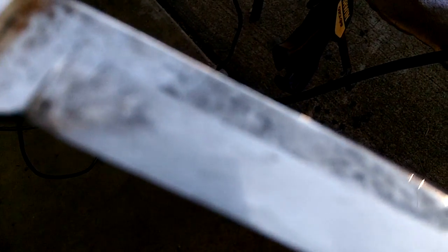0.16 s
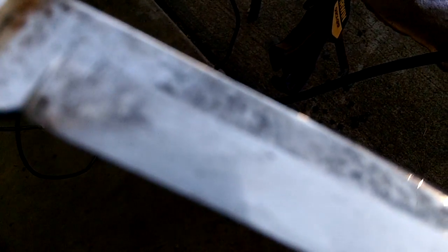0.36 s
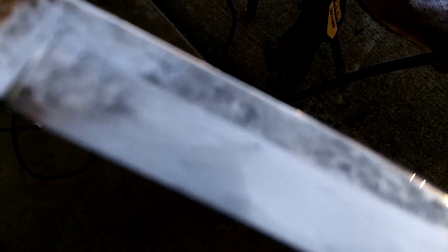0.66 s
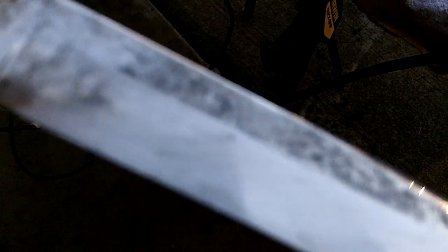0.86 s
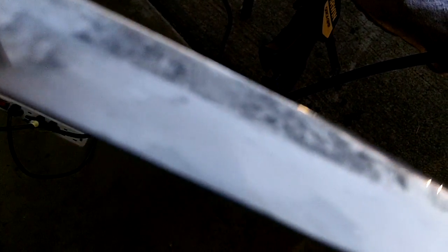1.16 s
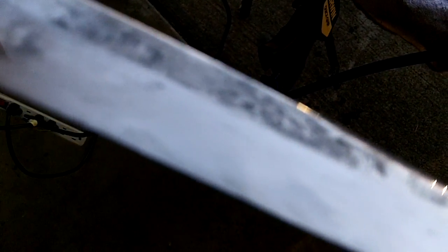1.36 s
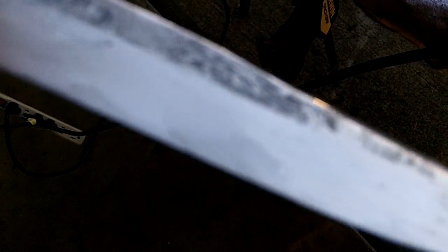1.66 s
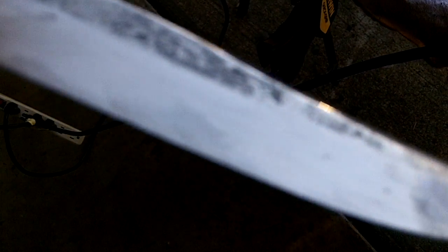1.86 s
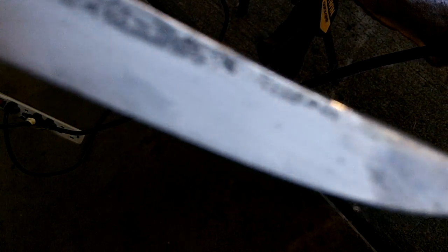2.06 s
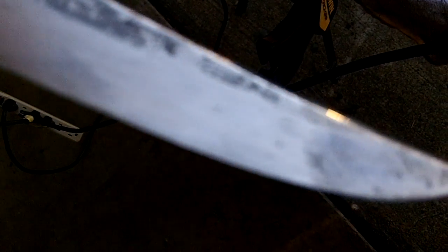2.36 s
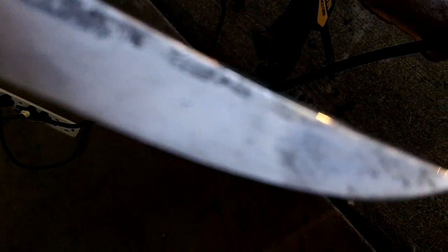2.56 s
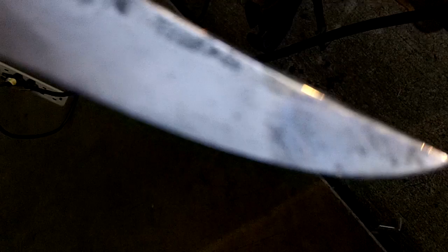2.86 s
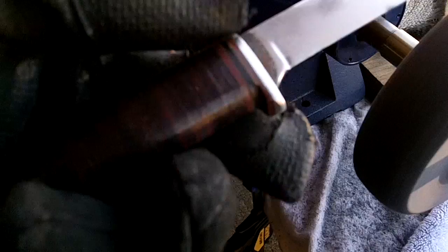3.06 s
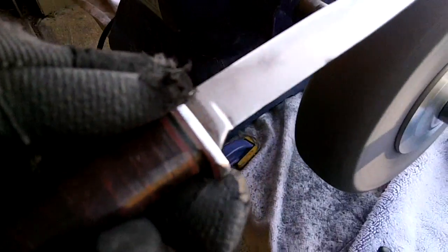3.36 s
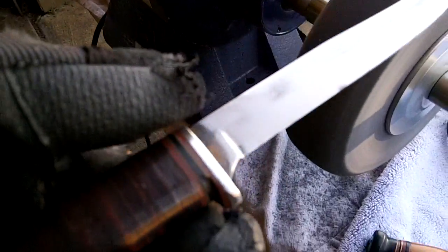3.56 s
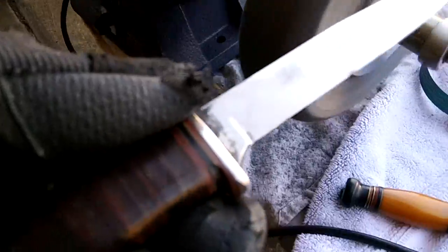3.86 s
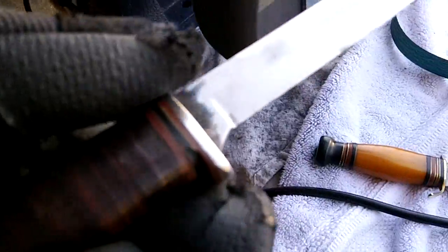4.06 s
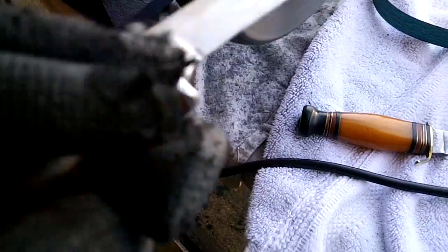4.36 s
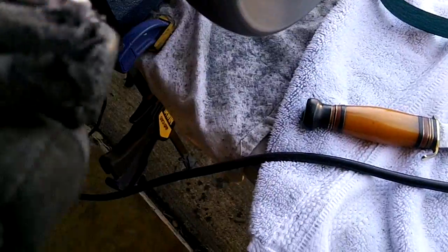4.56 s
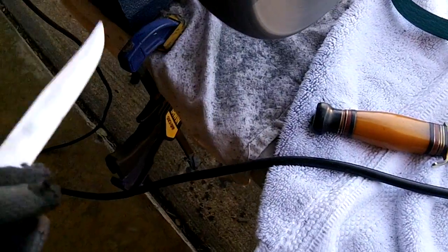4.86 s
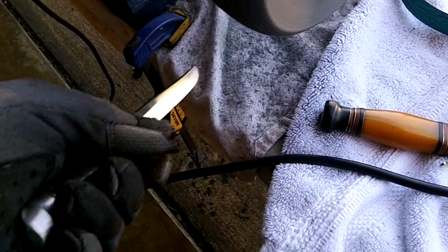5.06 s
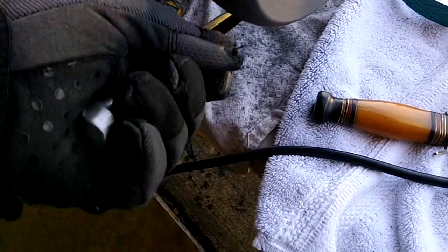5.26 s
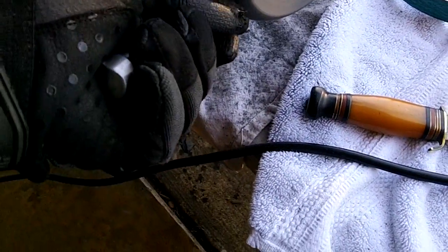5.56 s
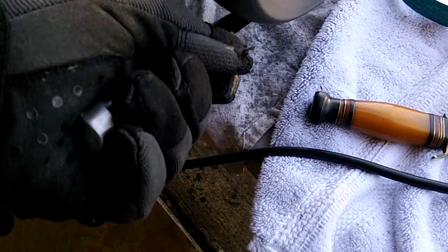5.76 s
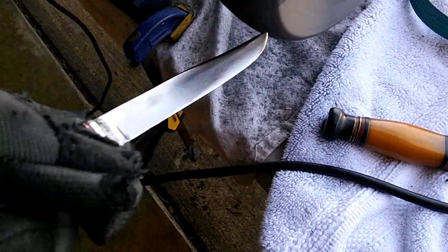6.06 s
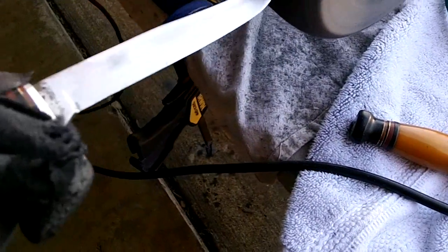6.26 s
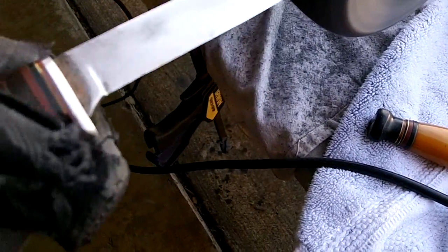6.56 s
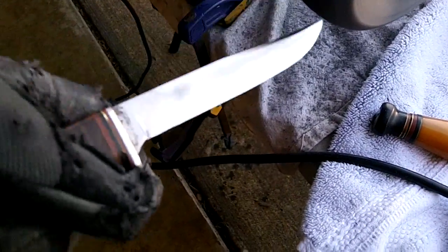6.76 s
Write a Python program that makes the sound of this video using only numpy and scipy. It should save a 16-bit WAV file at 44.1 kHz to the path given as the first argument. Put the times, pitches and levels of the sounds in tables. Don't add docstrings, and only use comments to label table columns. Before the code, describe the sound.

A quiet yard with low rumble, thin hiss and faint bird whistles. A glove rubs softly near the microphone, then a sharp button click. After a tiny silence, a bench buffer motor hums and whirrs steadily with louder bird notes. A steel blade is pressed on the spinning wheel with a loud, gritty, ringing scrape under a second long, pushing the motor down; the blade lifts and the motor continues.

```python
import sys
import numpy as np
from scipy import signal
from scipy.fft import rfft, irfft
from scipy.io import wavfile
from scipy.ndimage import uniform_filter1d

SR = 44100
rng = np.random.default_rng(int(sys.argv[2]) if len(sys.argv) > 2 else 0)


def ratio_of_db(decibels):
    return 10 ** (np.asarray(decibels, float) / 20)


def waveform_to_disk(signal):
    frames = np.transpose(np.atleast_2d(signal))
    scaled = np.clip(frames, -1, 1) * 32767
    samples = np.round(scaled).astype(np.int16)
    wavfile.write(sys.argv[1], SR, samples)


N = 304907
t = np.arange(N) / SR

TURN = 1477
CUT, RESUME = 3.079, 3.141

LAND_S, LIFT_S, BOUNCE_S, BOUNCE_WIDTH_S = 5.376, 6.128, 6.138, 0.0033
# (time [s], scrape level [dB], brightness [dB], low mode [Hz], upper mode [Hz])
PRESS = [
    (5.38, -32.5, -9.5, 1786, 2140),
    (5.48, -31.5, -5.5, 1730, 2155),
    (5.58, -36.5, 0.5, 1740, 2130),
    (5.726, -36.5, 2, 1764, 2150),
    (5.828, -35, -13.5, 1690, 2190),
    (5.985, -33.5, -12, 1630, 2260),
    (6.03, -38.5, 3, 1640, 2580),
    (6.118, -41.5, 1.5, 1540, 2500),
    (6.14, -41.5, -7, 1540, 2540),
]
# (time [s], low mode level [dB], side mode level [dB], high mode [Hz], high mode level [dB])
GRIP = [
    (5.38, -3.5, -3, 4800, -26),
    (5.47, -5.5, -4.5, 4800, -20),
    (5.55, -6, -10, 4820, -9),
    (5.62, -13, -19, 4760, -15),
    (5.72, -7, -17, 4630, -25),
    (5.775, -3, -4, 4830, -11.5),
    (5.84, -6, -7.5, 4200, -27),
    (5.97, -3.5, -14, 4030, -32),
    (6.05, -10, -16, 4750, -9),
]
# (frequency [Hz], level [dB per Hz])
SCRAPE = [(290, -46), (500, -18), (637, -29), (707, -10), (1700, -0.5), (1910, -1), (2190, 0.5),
          (3600, 2.5), (6200, -15.5), (7200, -13), (7900, -76), (10300, -90), (17400, -120)]
# (frequency [Hz], width [Hz], level [dB])
BLADE_MODES = [(3400, 270, -1), (4200, 600, -13), (5980, 320, -17), (885, 160, -11), (622, 50, -24)]
# (frequency [Hz], width [Hz], level [dB])
SPINE_MODES = [(910, 210, -19), (617, 47, -18.5), (2680, 180, -14.5), (6300, 1200, -42)]
# (frequency [Hz], width [Hz], level [dB])
TIP_MODES = [(3500, 480, -2.5), (4840, 890, -10.5), (5980, 870, -8), (1516, 100, -7)]
TIP_FROM_S, SIDE_HZ = 6.008, 2430
# (first time [s], last time [s], width [s], level [dB])
HIGH_SPOTS = [
    (5.39, 5.76, 0.0024, -3.5),
    (5.764, 5.98, 0.0036, -0.5),
    (6.0045, 6.11, 0.0024, 8),
    (6.002, 6.0, 0.0028, 1),
    (6.008, 6.12, 0.0015, -14),
    (6.013, 6.12, 0.0018, 3.5),
]
# (time [s], peak level [dB])
JOLTS = [(5.3787, -19), (5.3964, -18), (5.4173, -19), (5.4267, -21), (5.45, -21), (5.4597, -18),
         (5.486, -19), (5.517, -15.5), (5.5275, -20), (5.551, -15), (5.592, -23), (5.6178, -22),
         (5.6677, -27), (5.693, -23), (5.7033, -19.5), (5.742, -23), (5.764, -16), (5.801, -23),
         (5.8662, -30), (5.8995, -34), (5.9341, -27), (5.968, -18), (6.0014, -16)]
JOLT_RISE_S, JOLT_FALL_S, JOLT_MOST = .0004, .002, 1.1
# (start [s], end [s], start level [dB], end level [dB])
SIZZLE = [
    (5.375, 5.76, -74.5, -83),
    (6.03, 6.152, -71, -67),
]

# (multiple of shaft rate, level [dB rms], ducked level [dB rms])
ORDERS = [(1, -52, -53), (3, -53, -54), (4, -45.5, -52.5), (5, -55, -56.5), (6, -62, -62.5), (7, -58, -78),
          (8, -57.5, -65.5), (9, -60.5, -67), (10, -58, -64), (11, -55.5, -66.5), (12, -57.5, -70),
          (13, -61, -64.5), (14, -55, -65.5), (15, -56, -63), (18, -48.5, -57), (19, -62, -73),
          (20, -56.5, -63.5), (21, -69, -77), (22, -47, -54), (24, -62, -81), (26, -61.5, -71.5),
          (30, -57, -65.5), (38, -61.5, -73), (42, -58.5, -66), (46, -61.5, -68), (50, -74, -75),
          (54, -68.5, -75), (71.2, -69, -73)]
BEAT_DB, BEAT_SWING_DB, BEAT_PERIOD_S, BEAT_PEAK_S = -2.5, 3.5, 1.52, 4.74
# (frequency [Hz], level [dB per Hz])
WHIRR = [(12, -35), (20, -4), (115, -6.5), (172, -4.5), (329, -7.5), (480, -7), (647, -7), (716, -9),
         (1040, -15), (1240, -12), (1480, -11.5), (3210, -12), (6310, -29), (7650, -29), (7900, -57),
         (10300, -97), (17400, -120)]
WHIRR_DB = -44
# (frequency [Hz], width [Hz], level [dB rms])
HOUSING = [(3160, 290, -53.5), (4355, 290, -59), (880, 196, -56)]
# (frequency [Hz], gain [dB])
DUCKED_TONE = [(20, 6), (100, -2.5), (300, -6), (1000, -8), (3000, -9), (8000, -9)]
DUCK_FROM_S, DUCK_TIME_S = 5.35, 0.12

# (frequency [Hz], width [Hz], level [dB])
GLOVE = [(3100, 1200, 9), (4360, 640, -1), (6200, 350, -9), (3830, 630, 0)]
# (peak time [s], level [dB], swell for 20 dB [s], fade for 20 dB [s])
RUBS = [
    (1.978, -74.5, .18, 0.044),
    (2.5, -72.5, 0.69, 0.42),
    (2.6, -72, 0.078, 0.19),
    (2.682, -64, 0.11, 0.013),
    (2.945, -66.5, 0.1, .02),
    (2.957, -48, .012, 0.0078),
    (2.984, -80, .03, 0.076),
    (3.04, -85, .3, .3),
]
# (time [s], peak level [dB], ring [Hz], 60 dB decay [s])
TICKS = [(2.4, -52, 3350, 0.0065), (2.6835, -49, 4700, 0.0055), (2.6845, -54, 6000, 0.0044),
         (2.954, -31.5, 4200, 0.0049), (2.9533, -23.5, 1020, 0.0033), (2.9572, -20, 2950, 0.0075),
         (2.9556, -29.5, 5150, 0.0035), (2.9556, -27, 1260, 0.0061), (2.9615, -41, 3000, 0.0071),
         (2.984, -56, 3500, .006), (2.984, -57, 4900, 0.0055)]
# (time [s], level [dB], time constant [s])
PUSH = (2.9525, -36, 0.0022)

# (flick time [s], lead-in [s], knee pitch [Hz], top pitch [Hz], level [dB])
HOOKS = [
    (.748, 0.02, 2940, 3570, -70.5),
    (1.401, 0.049, 2940, 3530, -66),
    (1.87, 0.068, 2190, 3700, -65),
    (2.225, 0.061, 2180, 3680, -66.5),
    (2.57, 0.0595, 2230, 3700, -62.5),
    (2.83, .07, 2220, 3500, -65),
    (3.085, 0.068, 2200, 3600, -62.5),
]
LEAD_HZ_PER_S, LEAD_BEND, FLICK_S, TOP_S, SAG_HZ = 5600, 1.83, 0.02, 0.027, 560
LEAD_DB, KNEE_DB, TAIL_DB = -10.5, -4.5, -2.5
# (start [s], length
# [s], from pitch [Hz], to pitch [Hz], level [dB])
SLURS = [(0.052, .03, 3500, 2850, -78), (0.073, .025, 2850, 3220, -78), (0.106, .03, 3230, 2420, -74),
         (.14, .13, 3200, 3160, -89), (0.574, .09, 2000, 2220, -79), (1.08, .04, 6200, 5840, -83),
         (1.113, .08, 5910, 5980, -77), (1.185, .025, 5980, 6200, -80), (1.208, .02, 6200, 6800, -83),
         (1.22, 0.083, 1900, 2120, -75.5), (1.28, 0.057, 2120, 2460, -79), (1.372, 0.046, 4150, 3340, -77),
         (1.66, .03, 4550, 4500, -83), (1.713, 0.057, 4200, 2920, -81), (1.755, .035, 4020, 4000, -85),
         (1.915, 0.021, 3150, 2980, -81), (2.0, .035, 3600, 3580, -83), (2.045, 0.044, 3500, 2530, -78),
         (2.068, .03, 3650, 3570, -79), (2.111, .03, 3200, 2300, -76), (2.185, .045, 3330, 3370, -81),
         (2.876, 0.024, 3100, 2900, -68.5), (3.331, 0.12, 3150, 3510, -56.5),
         (3.446, 0.061, 3760, 3700, -58), (3.545, .045, 3700, 3670, -55), (3.253, .07, 3700, 3720, -67),
         (3.217, 0.093, 3080, 3060, -60), (3.77, 0.091, 3020, 2920, -59), (4.19, 0.061, 3150, 3296, -55.5),
         (4.88, 0.033, 3120, 3180, -54), (1.58, .025, 1950, 2020, -77), (3.717, .03, 3710, 3670, -54.5),
         (0.198, .07, 3280, 3130, -86), (.96, .08, 3320, 3200, -83), (1.06, .05, 1950, 2250, -82),
         (1.43, .02, 4150, 3750, -82), (1.59, 0.046, 4530, 4550, -86), (1.936, .07, 2050, 2000, -80),
         (2.897, .04, 2360, 3220, -74), (1.59, 0.052, 3150, 3110, -88), (2.08, .04, 2750, 2950, -81)]

# (frequency [Hz], level [dB per Hz])
RUMBLE_TONE = [(8.8, -34), (15, 3), (27, -11), (60, 1), (83, -2), (98, -19), (162, -14), (194, -18.5),
               (221, -16), (248, -29), (330, -24), (430, -47), (730, -120)]
RUMBLE_DB, RUMBLE_DB_PER_S, LUMPS_DB = -59.5, 1.8, 0.8
# (frequency [Hz], level [dB per Hz])
YARD = [(150, -33), (250, -2.5), (302, -18.5), (465, -8), (708, -14), (918, -13), (1120, -16), (1260, -16),
        (4830, -23.5), (6740, -27), (7900, -36), (10300, -75), (17400, -120)]
YARD_DB = -71.5
HUM_HZ, HUM_WIDTH_HZ, HUM_DB = 222, 14, -72

# (frequency [Hz], level [dB per Hz])
TOP_TONE = [(4820, -52), (8200, -35), (8470, -17), (8800, 5), (9000, 2.5), (9760, -2), (10600, 3),
            (11100, 1.5), (11780, -3), (11900, -26), (12030, -2), (12600, 2.5), (13200, -4.5),
            (13800, -0.5), (14400, -4), (14900, -6), (15050, -25)]
YARD_TOP_DB, MOTOR_TOP_DB, TOP_DUCK_DB, CLICK_TOP_DB = -83, -71.5, -7.5, -75
AIR_HZ, YARD_AIR_DB, BUSY_AIR_DB, DUCKED_AIR_DB = 12300, 6.5, -28, -6
# (frequency [Hz], share in the yard [0-1], share by the motor [0-1])
DROPOUT = [(8000, .3, .3), (9200, .06, .12), (9800, .05, .35), (10800, .03, .12), (12500, .1, .2),
           (13500, .15, .35), (14300, .2, .6), (14450, .25, .97)]
PATCH_BINS, PATCH_FRAMES = 8, 5
MAIN_EDGE_HZ, BUSY_EDGE_HZ = 7580, 7640


def blade(force):
    grit = force * turning_noise(0.37) * ratio_of_db(1.7 * np.minimum(rng.exponential(1, N), 5))
    low = evened(resonate(grit, curve(PRESS, column=3) * (1 + 0.013 * drift(25)), 250))
    upper = evened(resonate(grit, curve(PRESS, column=4) * (1 + .025 * drift(23)), 340))
    side = evened(resonate(grit, SIDE_HZ * (1 + .02 * drift(25)), 300))
    high = evened(resonate(grit, curve(GRIP, column=3) * (1 + 0.033 * drift(30)), 750))
    grip = ratio_of_db(curve(GRIP)) * low + ratio_of_db(curve(GRIP, column=2)) * side
    grip += ratio_of_db(curve(GRIP, column=4)) * high + ratio_of_db(-4.5) * upper
    scrape = evened(coloured(grit, SCRAPE))
    treble = ratio_of_db(curve(PRESS, column=2)) * (ratio_of_db(4.5) * scrape + ratio_of_db(-21.0) * ring(grit, BLADE_MODES))
    spine = ring(grit, SPINE_MODES) * ratio_of_db(-45 * np.maximum(t - TIP_FROM_S, 0) ** .5)
    tip = np.clip((t - TIP_FROM_S) / 0.056, 0, 1) * ring(grit, TIP_MODES)
    return touching() * ratio_of_db(curve(PRESS)) * (spine + tip + grip + treble)


def contact():
    force_db = 1.2 * drift(440) + 8 * uniform_filter1d(turning_noise(0.29), 100)
    for first, last, width, db in HIGH_SPOTS:
        for s in np.arange(first, last, TURN / SR):
            force_db += db * np.exp(-.5 * ((t - s) / width) ** 2)
    s, db = np.transpose(JOLTS)
    scrape_db = np.interp(s, *np.transpose(PRESS)[:2])
    hits, u = np.zeros(N), t[:SR // 40]
    hits[(s * SR).astype(int)] = ratio_of_db(db - scrape_db - 11)
    kick = (1 - np.exp(-u / JOLT_RISE_S)) * np.exp(-u / JOLT_FALL_S)
    jolts = signal.oaconvolve(hits, kick)[:N]
    return ratio_of_db(force_db + 7) * (1 + np.minimum(abs(jolts), JOLT_MOST))


def touching():
    held = np.clip((t - LAND_S) / 0.0044, 0, 1) * np.clip((LIFT_S - t) / 0.0033, 0, 1)
    return held + np.exp(-.5 * ((t - BOUNCE_S) / BOUNCE_WIDTH_S) ** 2)


def motor():
    duck, turns = ducking(), np.arange(N) / TURN
    orders = np.zeros(N)
    beat_db = BEAT_DB + BEAT_SWING_DB * np.cos(2 * np.pi * (t - BEAT_PEAK_S) / BEAT_PERIOD_S)
    for k, db, ducked_db in ORDERS:
        waver_db = beat_db if round(k) == 4 else 1.44 * drift(3.8)
        level_db = db + duck * (ducked_db - db) + waver_db
        orders += np.sqrt(2) * ratio_of_db(level_db) * np.sin(2 * np.pi * (round(k) * turns + rng.random()))
    whirr = ratio_of_db(WHIRR_DB) * evened(coloured(turning_noise(0.35), WHIRR))
    angle = 2 * np.pi * (turns - .6)
    throb = ratio_of_db(2.0 * np.cos(angle) + 2.3 * np.cos(2 * angle) + 1.8 * drift(42))
    for hz, width, db in HOUSING:
        rattle = throb * ratio_of_db(1.3 * drift(40)) * turning_noise(0.26)
        wander = 1 + .01 * drift(12) + .007 * drift(4)
        whirr += ratio_of_db(db) * evened(resonate(rattle, hz * wander, width))
    ducked = coloured(whirr, DUCKED_TONE)
    return orders + (1 - duck) ** 0.74 * whirr + (1 - (1 - duck) ** 1.1) * ducked


def ducking():
    return 1 - np.exp(-np.maximum(t - DUCK_FROM_S, 0) / DUCK_TIME_S)


def glove():
    flutter_db = 2.2 * np.clip(drift(58.4), -2, 2)
    snaps = rng.standard_normal(N) * ratio_of_db(1.4 * np.minimum(rng.exponential(1, N), 5) + flutter_db)
    cloth = evened(sum(ratio_of_db(db) * resonate(snaps, hz, width) for hz, width, db in GLOVE))
    rubs = np.zeros(N)
    for s, db, swell, fade in RUBS:
        fall_db = 20 * np.maximum((s - t) / swell, (t - s) / fade)
        rubs += ratio_of_db(db + 1.0 - np.minimum(fall_db, 99))
    out = cloth * rubs
    for s, db, hz, t60 in TICKS:
        u = np.maximum(t - s, 0)
        decay = ratio_of_db(db - np.minimum(60 * u / t60, 200))
        out += decay * np.sin(2 * np.pi * hz * u) * (1 - np.exp(-u / 0.0002))
    push_s, push_db, push_time = PUSH
    u = np.clip((t - push_s) / push_time, 0, 50)
    return out + ratio_of_db(push_db) * (u * np.exp(1 - u) - 0.26 * u * np.exp(-u / 4))


def birds():
    out = np.zeros(N)
    for row in HOOKS:
        add(out, *hook(*row))
    for s, length, from_hz, to_hz, db in SLURS:
        add(out, *whistle(s, [0, length], [from_hz, to_hz], [db, db]))
    out *= ratio_of_db(1.5 * drift(70))
    lag = t[:SR // 3]
    echoes = rng.standard_normal(len(lag)) * ratio_of_db(-60 * lag / .45) * (lag > .006)
    return out + ratio_of_db(-6.5) * signal.oaconvolve(out, echoes / np.linalg.norm(echoes))[:N]


def hook(s, lead, knee_hz, top_hz, db):
    u = np.linspace(0, 1, num=9)
    times = np.concatenate([lead * u, lead + FLICK_S * u[1:], lead + FLICK_S + TOP_S * u[1:]])
    rise = knee_hz - LEAD_HZ_PER_S * lead * (1 - u ** LEAD_BEND)
    flick = knee_hz + (top_hz - knee_hz) * np.sin(np.pi / 2 * u[1:])
    sag = top_hz - SAG_HZ * u[1:] ** 1.2
    level_db = db + np.interp(times, times[::8], [LEAD_DB, KNEE_DB, 0, TAIL_DB])
    return whistle(s - lead, times, np.concatenate([rise, flick, sag]), level_db)


def whistle(start, times, hz, db):
    u = t[:round(times[-1] * SR)]
    turns = np.cumsum(uniform_filter1d(np.interp(u, times, hz), 200)) / SR
    level = ratio_of_db(np.interp(u, times, db) + 5.5) * signal.windows.tukey(len(u), .25)
    return start, level * np.sin(2 * np.pi * turns)


def yard():
    rumble_db = RUMBLE_DB + RUMBLE_DB_PER_S * t + LUMPS_DB * drift(18)
    rumble = ratio_of_db(rumble_db) * evened(coloured(rng.standard_normal(N), RUMBLE_TONE))
    wash = evened(coloured(rng.standard_normal(N), YARD)) * ratio_of_db(YARD_DB + 2.5 + 0.52 * drift(5.4))
    return rumble + wash + ratio_of_db(HUM_DB) * evened(resonate(wash, HUM_HZ, HUM_WIDTH_HZ))


def top_band(force):
    running = t > RESUME
    duck = ducking()
    level = ratio_of_db(np.where(running, MOTOR_TOP_DB + TOP_DUCK_DB * duck, YARD_TOP_DB) + 0.96 * drift(30))
    level += ratio_of_db(CLICK_TOP_DB - np.minimum(abs(t - PUSH[0] - .005) * 2500, 99))
    for start, end, start_db, end_db in SIZZLE:
        sizzle = ratio_of_db(np.interp(t, [start, end], [start_db, end_db]))
        level += (t > start) * (t < end) * touching() * force ** 0.73 * sizzle
    hiss = evened(patchy(coloured(rng.standard_normal(N), TOP_TONE)))
    air = signal.sosfiltfilt(signal.butter(8, AIR_HZ, "high", fs=SR, output="sos"), hiss)
    air_db = np.where(running, DUCKED_AIR_DB * duck, YARD_AIR_DB) + BUSY_AIR_DB * busy()
    return level * (hiss + air * (ratio_of_db(air_db) - 1))


def patchy(x):
    hz, s, z = signal.stft(x, SR, nperseg=1024, noverlap=768)
    luck = rng.random((len(hz) // PATCH_BINS + 1, len(s) // PATCH_FRAMES + 1))
    luck = luck.repeat(PATCH_BINS, axis=0).repeat(PATCH_FRAMES, axis=1)[:len(hz), :len(s)]
    f, quiet, loud = np.transpose(DROPOUT)
    share = np.where(s > RESUME, np.interp(hz, f, loud)[:, None], np.interp(hz, f, quiet)[:, None])
    return signal.istft(z * (luck > share), SR, nperseg=1024, noverlap=768)[1][:N]


def busy():
    return np.clip((t - LAND_S) / 0.13, 0, 1) * np.clip((SIZZLE[1][0] + 0.022 - t) / 0.048, 0, 1)


def evened(x):
    return x / np.sqrt(np.mean(x ** 2) + 1e-20)


def curve(rows, column=1):
    rows = np.asarray(rows)
    return np.interp(t, rows[:, 0], rows[:, column])


def coloured(x, points):
    size = N + 245
    hz, (f, db) = np.fft.rfftfreq(size, 1 / SR), np.transpose(points)
    gain = ratio_of_db(np.interp(np.log(hz + 1), np.log(f + 1), db, left=-100, right=-100))
    return irfft(rfft(x, size) * gain)[:N]


def resonate(x, hz, width):
    turn = np.exp(2j * np.pi * np.cumsum(hz * np.ones(len(x))) / SR)
    r = np.exp(-np.pi * width / SR)
    smooth = signal.lfilter([(1 - r) ** 2], [1, -2 * r, r * r], x / turn + 1e-18)
    return 2 * (turn * smooth).real


def ring(x, modes):
    return sum(ratio_of_db(db) * evened(resonate(x, hz, width)) for hz, width, db in modes)


def drift(hz):
    span = int(SR / hz)
    return evened(uniform_filter1d(uniform_filter1d(rng.standard_normal(N), span), span))


def turning_noise(memory):
    memory = np.clip(memory, 0, .95)
    fresh = rng.standard_normal((N // TURN + 1, TURN))
    return evened(signal.lfilter([1], [1, -memory], fresh, axis=0).ravel()[:N])


def add(mix, s, sound):
    mix[round(s * SR):][:len(sound)] += sound


def scene():
    force = contact()
    first = np.clip((CUT - t) / 0.0023, 0, 1)
    second = np.clip((t - RESUME - .002) / 0.015, 0, 1)
    near = np.where(t < CUT + .03, yard() + glove(), motor() + blade(force)) + birds()
    main = signal.sosfilt(signal.cheby2(10, 45, MAIN_EDGE_HZ * 1.08, fs=SR, output="sos"), near)
    narrow = signal.sosfiltfilt(signal.cheby2(8, 30, BUSY_EDGE_HZ, fs=SR, output="sos"), main)
    main = main + busy() * (narrow - main)
    return ((first + second) * (main + top_band(force)))[None]


def roll_off(x):
    return signal.sosfilt(signal.butter(12, 15140, fs=SR, output="sos"), x)


def record(dry):
    return roll_off(dry)


dry = scene()
out = record(dry)
waveform_to_disk(out)
```